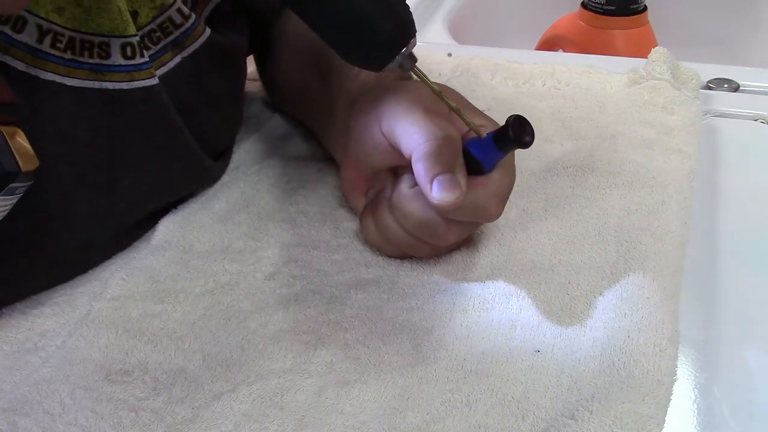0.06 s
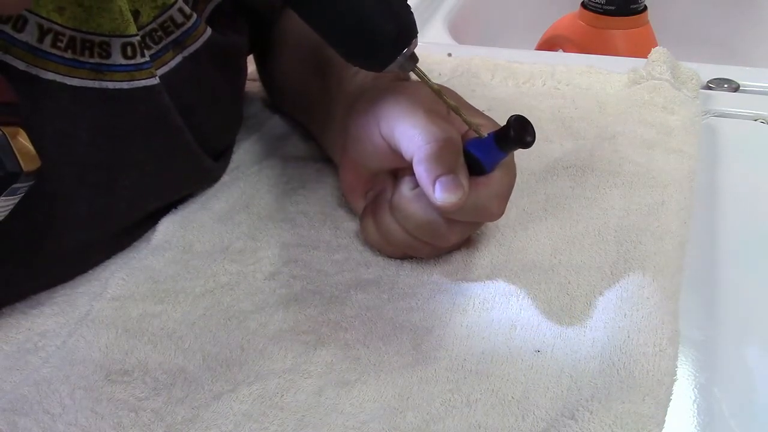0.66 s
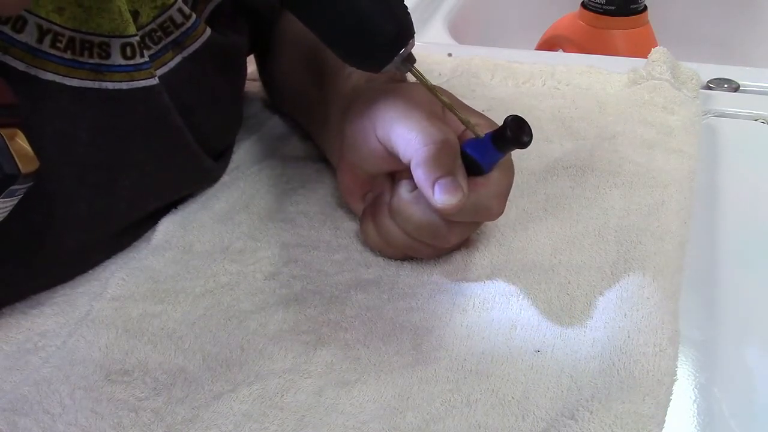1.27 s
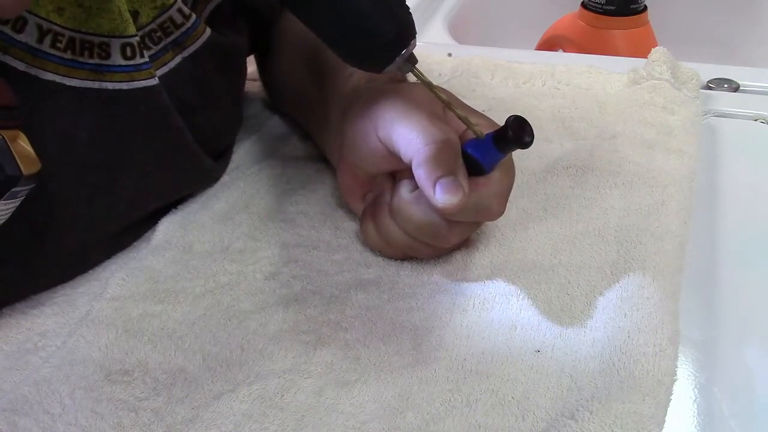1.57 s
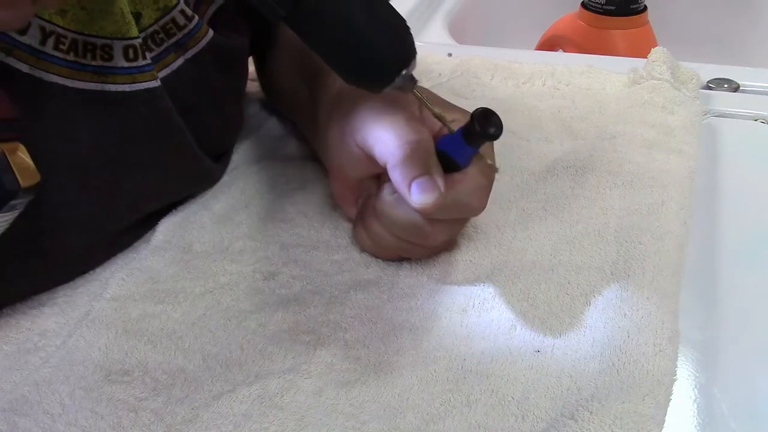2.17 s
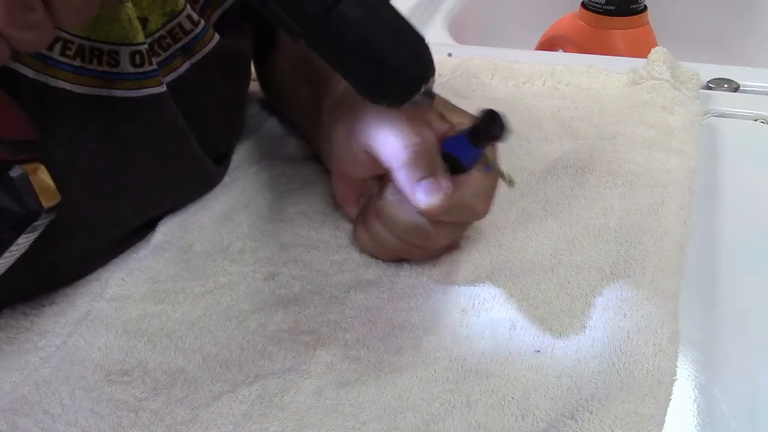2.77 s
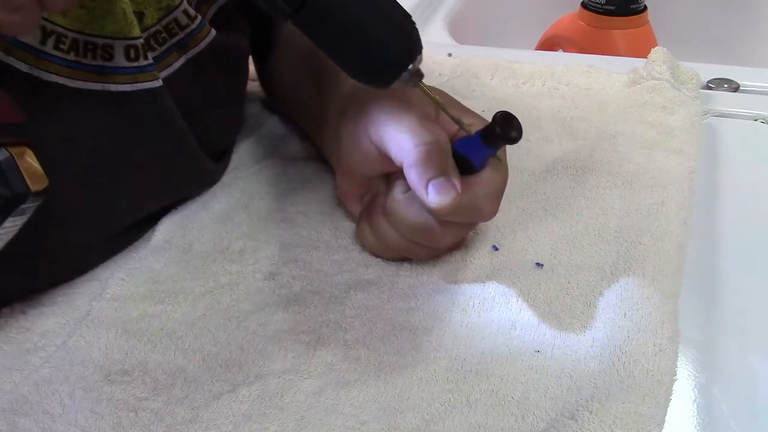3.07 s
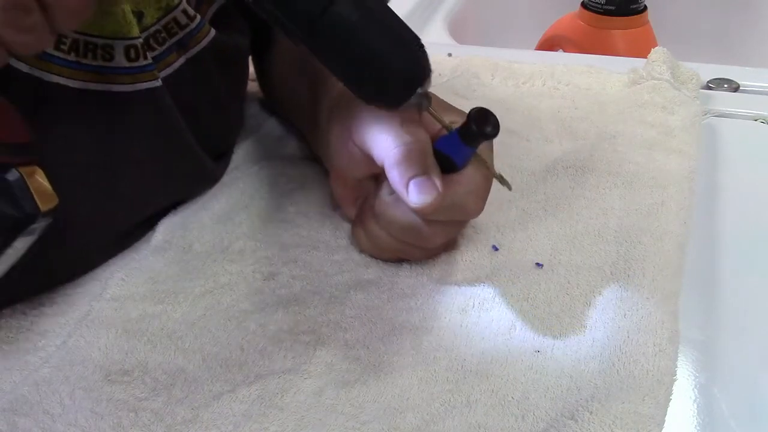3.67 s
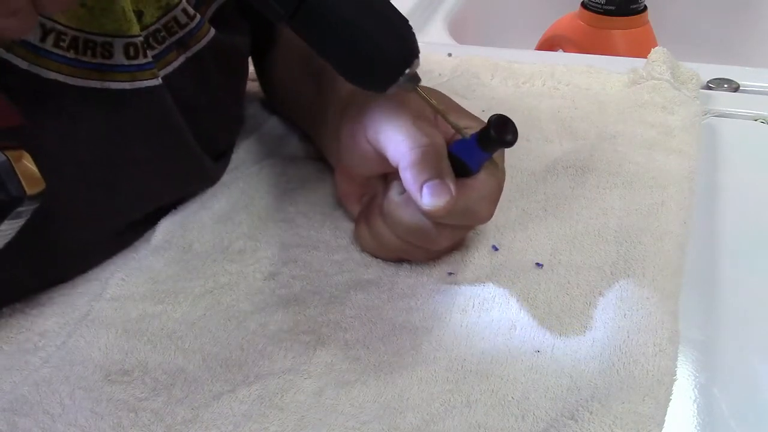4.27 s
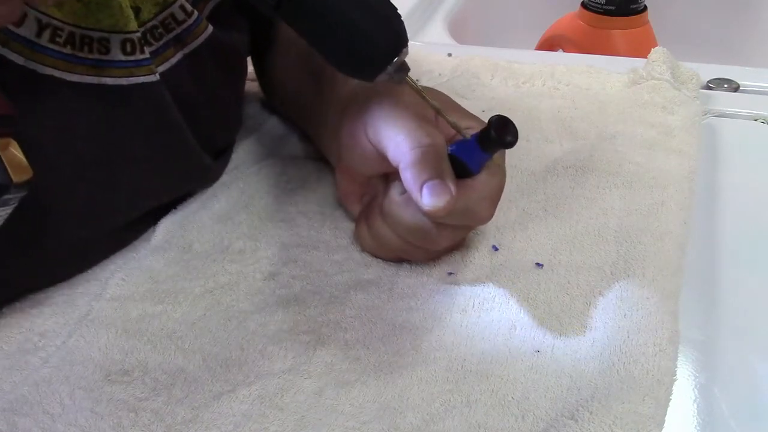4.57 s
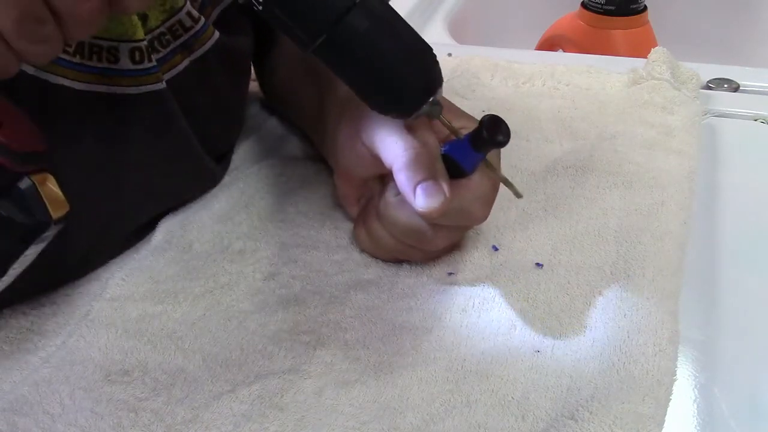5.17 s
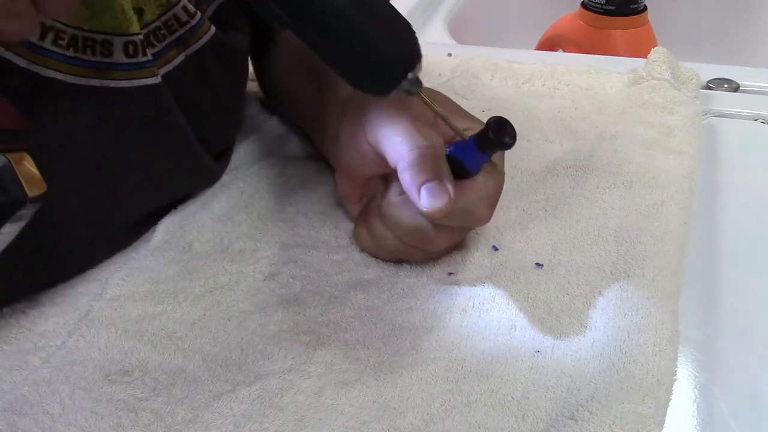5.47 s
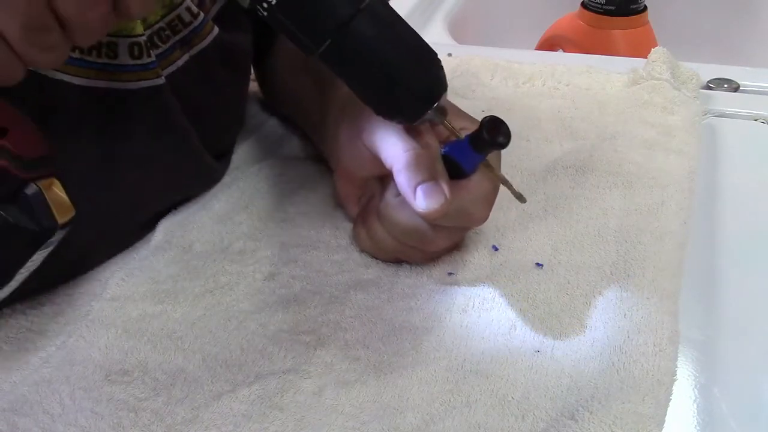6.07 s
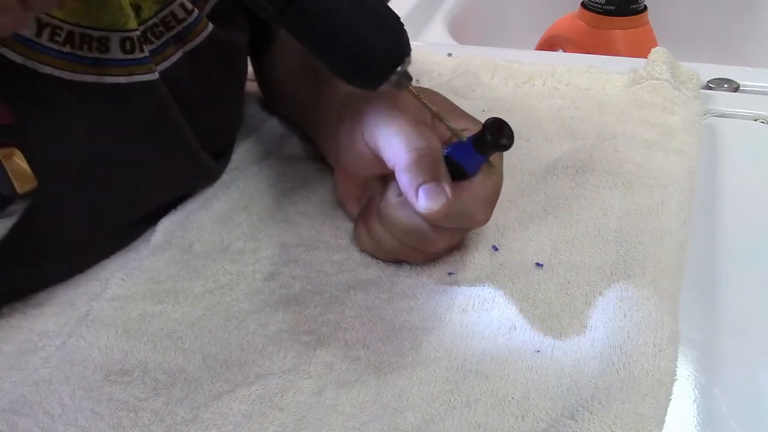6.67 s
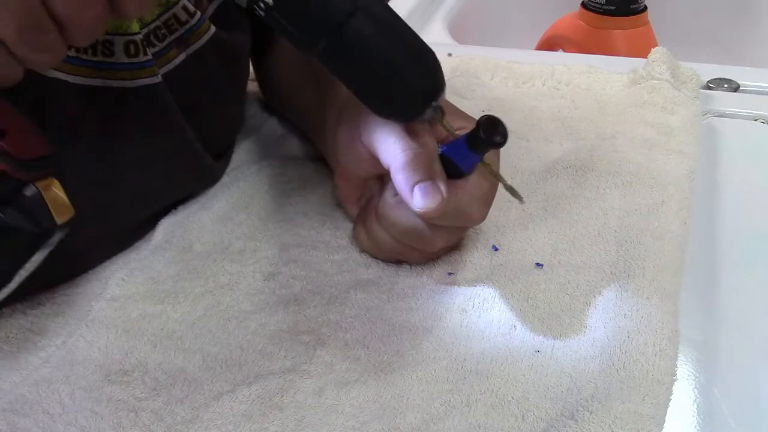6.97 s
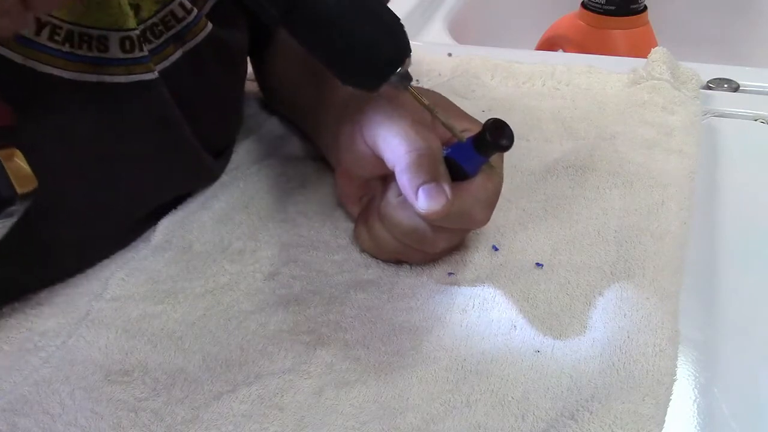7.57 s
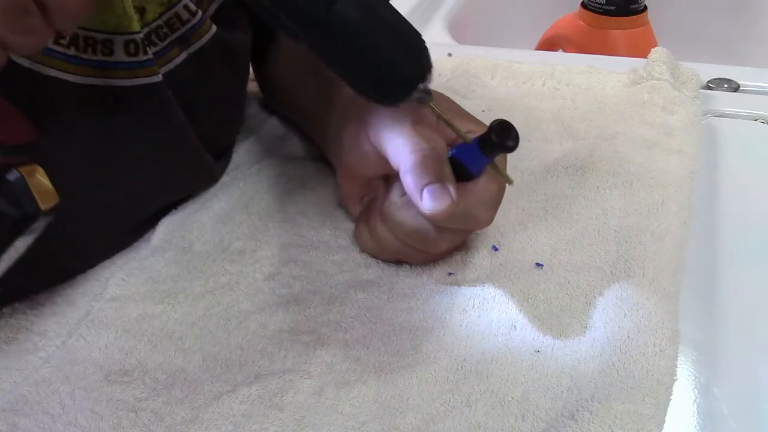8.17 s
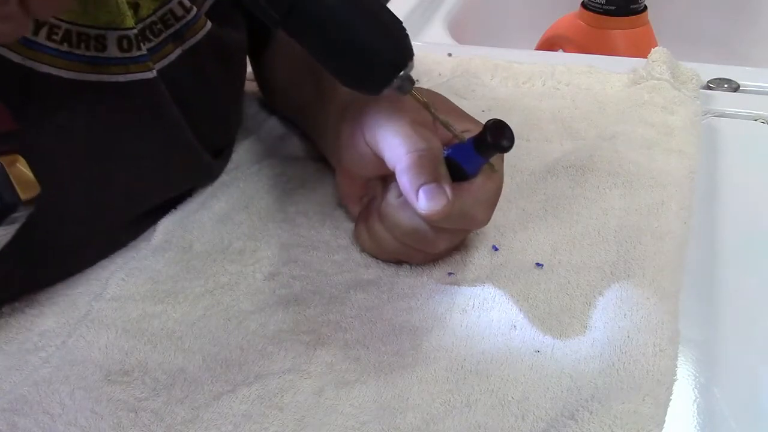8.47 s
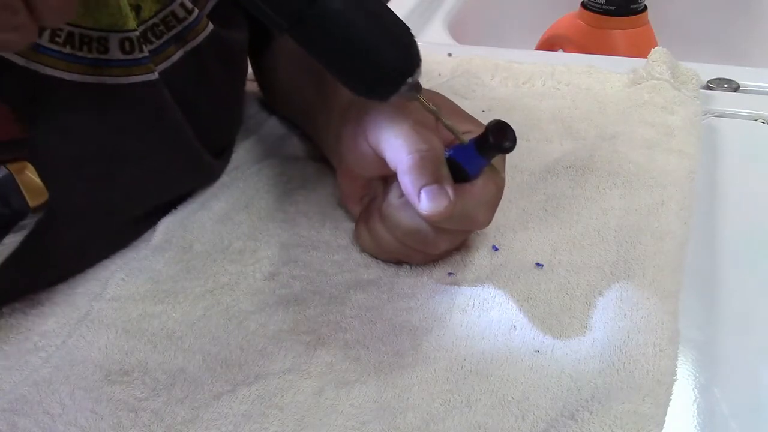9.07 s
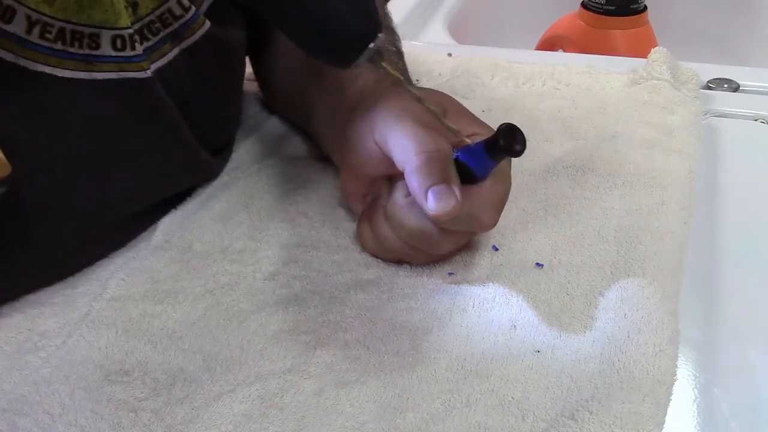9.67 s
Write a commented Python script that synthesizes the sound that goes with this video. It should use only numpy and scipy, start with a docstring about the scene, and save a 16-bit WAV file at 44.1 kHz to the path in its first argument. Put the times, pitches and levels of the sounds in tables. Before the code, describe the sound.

A cordless drill runs close to the microphone, whining and rattling, with a thin high whistle at first. The whistle fades and the motor steps up to full speed. Its tone swells and eases as the bit works back and forth through a plastic handle, rubbing in the hole. Near the end it brakes sharply with two quick clacks. Faint hand thuds on a towel and a low hum sit behind it in a small, dry room.

```python
"""A close cordless drill whines and rattles, with a thin whistle on light trigger; at 2 s it steps up
to full speed. The five-slot motor sings on multiples of its shaft speed; gear teeth and bit rattle the
housing as the bit is worked back and forth through a hand-held plastic handle, rubbing in its hole.
On release, near 9.7 s, the motor brakes and the spindle lock clacks twice.
Behind it: soft hand thuds on a towel, mains hum and the air of a small, dry room."""
import sys
import numpy as np
from scipy import signal
from scipy.fft import rfft, irfft, next_fast_len
from scipy.io import wavfile

SR = 44100
rng = np.random.default_rng(int(sys.argv[2]) if len(sys.argv) > 2 else 0)


def persist_wave(psi):
    """Save psi, clipped to +-1, as 16-bit WAV."""
    counts = np.round(np.clip(psi, -1, 1) * 32767).astype(np.int16)
    wavfile.write(sys.argv[1], SR, np.atleast_2d(counts).T)


N = 437031
T = np.arange(N) / SR
FFT_SIZE = next_fast_len(N + SR // 2, real=True)
BINS_HZ = np.maximum(np.arange(FFT_SIZE // 2 + 1) * SR / FFT_SIZE, 1)
SLOTS = 5


def undb(db):
    """Decibels to gain."""
    return 10 ** (np.asarray(db) / 20)


def unit(x):
    """Scale to rms 1."""
    return x / np.sqrt(np.mean(x ** 2))


def curves(table):
    """Each column after the first, interpolated over time."""
    times_s, *columns = np.transpose(table)
    return [np.interp(T, times_s, column) for column in columns]


def colour(x, gain):
    """Filter by a gain per frequency."""
    return irfft(rfft(x, FFT_SIZE) * gain, FFT_SIZE)[:N]


def noise(gain):
    """Coloured noise, rms 1."""
    return unit(colour(rng.standard_normal(N), gain))


def resonance(hz, width_hz):
    """Gain of a band-pass applied twice."""
    return 1 / (1 + ((BINS_HZ / hz - hz / BINS_HZ) * hz / width_hz) ** 2)


def drift(rate_hz):
    """Slow random drift, rms 1."""
    return noise(1 / (1 + (BINS_HZ / rate_hz) ** 2))


def swell(middle_s, length_s):
    """Half-cosine rise and fall, peak 1."""
    return np.cos(np.pi * np.clip((T - middle_s) / length_s, -.5, .5))


def partial(angle, db, flutter_db, slip_rad):
    """One line of the motor; bearing play shakes its level and phase."""
    amplitude = np.sqrt(2) * undb(db + flutter_db * drift(41))
    return amplitude * np.sin(angle + rng.uniform(0, 2 * np.pi) + slip_rad * drift(36))


# room air spectrum: freq_hz, relative_density_db
AIR_SPECTRUM = [(20, -4), (60, -8), (140, -1.5), (400, 0), (1500, -13), (5000, -10), (15000, -34)]

def room_air(level_db=-51.5):
    """Steady, mostly low noise of the room."""
    hz, db = np.transpose(AIR_SPECTRUM)
    return undb(level_db) * noise(undb(np.interp(np.log(BINS_HZ), np.log(hz), db)))


# hand thuds: middle_s, length_s, level_db
THUDS = [(2.76, .1, -43), (2.9, .3, -53), (3.94, 0.22, -52), (4.22, .2, -57), (5.5, .3, -57),
         (6.2, .15, -51), (7.2, 0.33, -51), (7.5, .12, -55), (8.13, 0.32, -50), (8.38, .15, -55),
         (9.1, .3, -54)]

def hands(shifting_db=-60.5, spread_db=3.5):
    """Hands on the towel: low thuds over faint shifting."""
    rumble = noise(resonance(97, 97))
    thuds = sum(undb(db) * swell(s, length_s) for s, length_s, db in THUDS)
    shifting = undb(shifting_db + spread_db * drift(4))
    return rumble * np.hypot(thuds, shifting)


def background(hum_hz=120, hum_db=-62.5):
    """Hands, mains hum and room air."""
    return hands() + undb(hum_db) * np.sin(2 * np.pi * hum_hz * T) + room_air()


def reflections(x, t60_s=0.17, wet_db=-27):
    """Short, quiet room tail, different at each ear."""
    age_s = T[:SR // 3]
    tails = rng.standard_normal((2, len(age_s))) * np.exp(-np.log(1000) * age_s / t60_s) * (age_s > .003)
    tails /= np.sqrt(np.sum(tails ** 2, axis=1, keepdims=True))
    return undb(wet_db) * signal.fftconvolve(x[None], tails, axes=1)[:, :N]


# speed control tone: time_s, pitch_hz, level_db
CONTROL_TONE = [(0, 4358, -28), (.62, 4350, -27), (.9, 4346, -29), (1.05, 4325, -45), (1.2, 4315, -80)]

def control_whistle():
    """Chopped motor current sings until the trigger is pulled further."""
    hz, db = curves(CONTROL_TONE)
    return partial(2 * np.pi * np.cumsum(hz) / SR, db, flutter_db=-0.8, slip_rad=.15)


# bit against the hole wall: middle_s, length_s, pitch_hz, level_db
BIT_RUBS = [(1.91, 0.098, 2750, -21), (2.075, .1, 3070, -19), (2.19, 0.28, 3070, -25),
            (3.158, 0.48, 5400, -31), (4.5, 0.57, 5450, -30), (5.65, .25, 5400, -31),
            (6.55, 0.29, 5400, -26), (9.55, 0.38, 5330, -29)]

def bit_rubbing(width_hz=220):
    """Friction on the plastic swells and fades in one narrow resonance of the bit."""
    return sum(undb(db) * swell(s, length_s) * noise(resonance(hz, width_hz))
               for s, length_s, hz, db in BIT_RUBS)


# lock catches: start_s, gain_db
LOCK_CATCHES = [(9.7955, -22.5), (9.813, -13.5)]
# chuck and spindle modes: pitch_hz, relative_db, t60_s
CHUCK_MODES = [(347, -6.5, 0.054), (810, -15, .06), (2010, 0, 0.027), (3060, 3, .04), (3850, 4, 0.02),
               (5356, -14, .03), (6471, -14, .04), (8812, -22, .04), (11230, -18, .035)]

def spindle_lock(crack_decay_s=0.0037):
    """Each catch cracks and rings the chuck; the clack carries no bass."""
    clacks = np.zeros(N)
    for start_s, gain_db in LOCK_CATCHES:
        age_s = np.maximum(T - start_s, 0)
        ring = sum(undb(db) * np.sin(2 * np.pi * hz * age_s) * np.exp(-np.log(1000) * age_s / t60_s)
                   for hz, db, t60_s in CHUCK_MODES)
        crack = noise(resonance(3400, 8400)) * np.exp(-age_s / crack_decay_s) * (age_s > 0)
        clacks += undb(gain_db) * (ring + crack)
    return signal.sosfilt(signal.butter(4, 330, "highpass", fs=SR, output="sos"), clacks)


# trigger travel: time_s, position (0 light, 1 half, 2 full)
TRIGGER_TRAVEL = [(0, 0), (.92, 0), (1.15, 1), (2.03, 1), (2.08, 2)]

def by_trigger(levels):
    """Blend light, half and full values by trigger position."""
    position, = curves(TRIGGER_TRAVEL)
    return np.interp(position, np.arange(3), levels)


# pushes through the hole: middle_s, length_s, relative_force
BIT_PUSHES = [(1.14, 0.46, 0.6), (1.93, 0.31, 0.66), (2.132, 0.25, 0.9), (2.33, 0.27, 0.5), (3.14, 1, 0.46),
              (4.436, 0.65, 0.44), (5.15, 0.61, 0.24), (6.0, 0.52, 0.58), (7.02, .52, 0.73),
              (7.92, 0.54, 0.73), (8.788, 0.53, 0.5), (9.695, .11, 0.9)]

def push_force(shape=0.86):
    """Hand force on the drill; a shape below 1 holds longer and lets go faster."""
    return sum(force * swell(s, length_s) ** shape for s, length_s, force in BIT_PUSHES)


# housing and gearbox resonances: centre_hz, width_hz, relative_db
HOUSING_MODES = [(319, 150, -14), (463, 119, -7), (530, 15, -13), (858, 296, -7), (966, 150, -5),
                 (1120, 170, -7), (1370, 227, -3.5), (1796, 230, -2), (1987, 380, -4), (2260, 250, -4),
                 (2930, 880, -1), (3130, 140, -8), (3897, 590, -2), (4744, 1050, -4.5), (5610, 750, -5.5),
                 (6404, 850, -6), (7820, 1640, -10.5), (9880, 2300, -12), (11200, 850, -10.5),
                 (12180, 760, -7), (14100, 1900, -18)]
# rattle on light, half and full trigger: gain_db, treble_offset_db
RATTLE_GAINS = [(-20, -4.5), (-18, -4), (-19, -0.5)]

def rattle(angle, running, slot_depth=0.27, turn_depth=0.09, wear_db_per_s=0.216):
    """Dense tooth and chip impacts bunch at every slot and every turn and ring the housing."""
    force = push_force()
    gain_db, treble_db = map(by_trigger, np.transpose(RATTLE_GAINS))
    gain_db = gain_db + .5 * force - wear_db_per_s * T  # eases as the hole wears wider
    treble_db = treble_db + 1.7 * force
    impacts = rng.standard_normal(N) * (rng.random(N) < .7)
    once_a_turn = sum(np.cos(k * angle) for k in range(1, SLOTS)) / 2
    impacts = unit(impacts * (1 + slot_depth * np.cos(SLOTS * angle) + turn_depth * once_a_turn))
    body = unit(np.sqrt(sum((undb(db) * resonance(hz, width_hz)) ** 2
                            for hz, width_hz, db in HOUSING_MODES)))
    low = 1 / (1 + (BINS_HZ / 1500) ** 4)
    high = 1 / (1 + (6800 / BINS_HZ) ** 6)
    drone = colour(impacts, body * low) * undb(by_trigger([-15, -15.67, -16.34]) + 0.67 * drift(10))
    mids = colour(impacts, body * (1 - low - high)) * undb(gain_db + 4)
    treble = colour(impacts, body * high) * undb(gain_db + treble_db + 6)
    flicker = undb(0.14 * drift(25))
    return (drone + mids + treble) * running * flicker


# shaft harmonics by trigger position: multiple, light_db, half_db, full_db
SHAFT_ORDERS = [(1, -40, -39, -35), (2, -55, -48, -43), (3, -34, -33, -36), (4, -50, -45, -39),
                (6, -35, -30, -36), (8, -35, -41, -42), (11, -28, -43, -42), (12, -44, -44, -37),
                (13, -31, -38, -37), (16, -46, -44, -41), (17, -48, -31, -36), (18, -31, -33, -48),
                (19, -37, -40, -41), (21, -43, -36, -42), (24, -37, -42, -41), (25, -43, -37, -37),
                (26, -35, -42, -45), (28, -44, -47, -40), (30, -36, -44, -34), (31, -40, -38, -45),
                (32, -34, -44, -49), (33, -36, -39, -47), (34, -43, -47, -40), (35, -35, -36, -39),
                (36, -36, -42, -45), (37, -33, -50, -46), (38, -40, -42, -46), (39, -46, -42, -42),
                (40, -32, -32, -45), (41, -38, -34, -45), (43, -42, -52, -55), (46, -48, -44, -58),
                (48, -47, -54, -60)]

def shaft_harmonics(angle):
    """Weaker lines from the uneven brushes and armature."""
    lines = np.zeros(N)
    for multiple, *levels_db in SHAFT_ORDERS:
        loose = min(multiple / 3, 1)  # the once-a-turn hum of imbalance is steadiest
        slip_rad = 0.15 * loose + 0.007 * multiple
        lines += partial(multiple * angle, by_trigger(levels_db), 2.56 * loose, slip_rad)
    return lines


# speed of each SLOT_LEVELS row: shaft_hz
SLOT_SPEEDS = [180, 295, 299, 305, 306.8, 330]
# slot harmonics, running free: h1_db, h2_db, h3_db, h4_db
SLOT_LEVELS = [(-27, -38, -32, -38), (-28, -30, -34, -35), (-27, -31, -29, -29), (-33, -36, -31, -28.5),
               (-46, -28, -31, -26.5), (-29, -28, -28, -25)]
# change on pushing, rubbing and drawing the bit out: h1_db, h2_db, h3_db, h4_db
PUSH_CHANGE = [1.3, 1.9, 11.7, 0.98]
RUB_CHANGE = [-0.5, 1, 1, -3]
WITHDRAW_CHANGE = [3.5, -4, -5.5, -10]

def slot_whine(angle, shaft_hz, withdraw_start_s=9.2, withdraw_length_s=.5, release_s=9.725):
    """Strong harmonics of the armature slots, which the case passes differently at each speed."""
    contact = sum(swell(s, length_s) for s, length_s, _, _ in BIT_RUBS)
    withdrawn = np.clip((T - withdraw_start_s) / withdraw_length_s, 0, 1)
    levels_db = np.array([np.interp(shaft_hz, SLOT_SPEEDS, db) for db in np.transpose(SLOT_LEVELS)])
    levels_db += np.outer(PUSH_CHANGE, push_force())
    levels_db += np.outer(RUB_CHANGE, contact)
    levels_db += np.outer(WITHDRAW_CHANGE, withdrawn)
    levels_db[2:] -= 14 * np.clip((T - release_s) / 0.023, 0, 1)  # no current: the top two die first
    return sum(partial(k * SLOTS * angle, db, flutter_db=1.29, slip_rad=0.12)
               for k, db in enumerate(levels_db, 1))


def motor(angle, running, shaft_hz):
    """Slot and shaft lines fade as the shaft stops; the small case radiates little bass."""
    lines = slot_whine(angle, shaft_hz) + shaft_harmonics(angle)
    turning = np.clip((shaft_hz - 45) / 70, 0, 1)
    return colour(lines * running * turning, 1 / (1 + (220 / BINS_HZ) ** 8))


# speed as the trigger is squeezed and the bit bites: time_s, shaft_hz
SHAFT_SPEED = [(0, 293.6), (.93, 295.5), (1.02, 299.8), (1.14, 303.7), (1.38, 306.9), (1.82, 306.4),
               (1.95, 300.7), (2.035, 299.8), (2.085, 332), (2.6, 333.1), (3.1, 334.4), (3.4, 333.4),
               (6.5, 333), (9.66, 332.5), (9.75, 326)]

def shaft_motion(waver_hz=.45, half_speed_s=9.787, brake_tau_s=.0125):
    """Shaft speed and running gain: the unsteady hand wavers the speed, the brake takes both to zero."""
    brake = 1 / (1 + np.exp((T - half_speed_s) / brake_tau_s))
    driven_hz, = curves(SHAFT_SPEED)
    return (driven_hz + waver_hz * drift(4)) * brake, brake ** 0.65


def scene():
    """Drill just left of centre; the treble of its rattle spreads between gearbox and bit."""
    shaft_hz, running = shaft_motion()
    angle = 2 * np.pi * np.cumsum(shaft_hz) / SR
    drill = motor(angle, running, shaft_hz) + rattle(angle, running)
    drill += bit_rubbing() * running + control_whistle() + spindle_lock()
    # the drill sounds wider in the treble and in a narrow band near 1.7 kHz
    treble_band = 1 / (1 + (4000 / BINS_HZ) ** 14) / (1 + (BINS_HZ / 13000) ** 14)
    side_bands = treble_band + resonance(1710, 120)
    side = colour(drill, side_bands * (undb(-31) - 1j * undb(-19.5)))
    side += colour(rattle(angle, running), undb(-18) * side_bands)
    side += undb(-27) * background()
    return np.array([drill + side, drill - side]) + reflections(drill) + background()


def record(dry, ceiling=.95, top_hz=15750):
    """Round the highest peaks and cut the top."""
    rounded = dry / (1 + (dry / ceiling) ** 8) ** (1 / 8)
    return signal.sosfiltfilt(signal.ellip(10, .05, 60, top_hz, fs=SR, output="sos"), rounded)


dry = scene()
out = record(dry)
persist_wave(out)
```